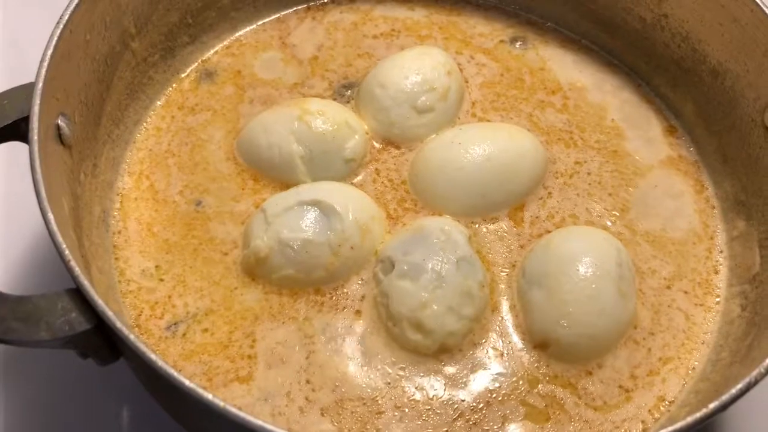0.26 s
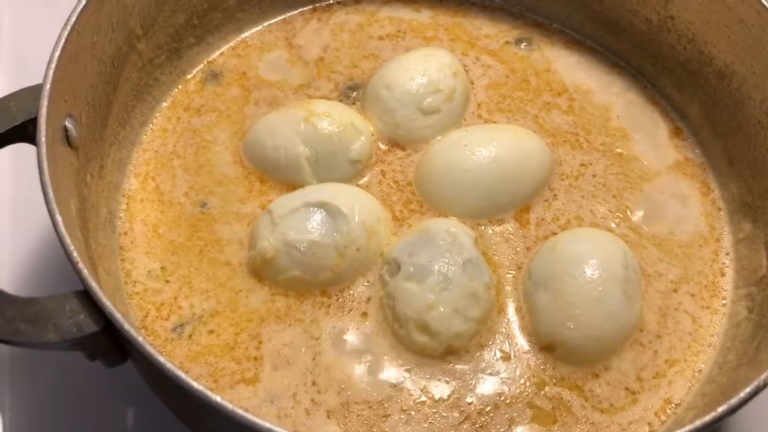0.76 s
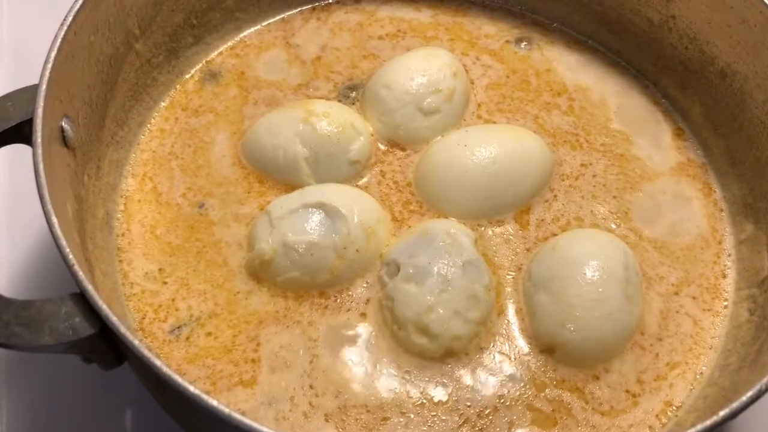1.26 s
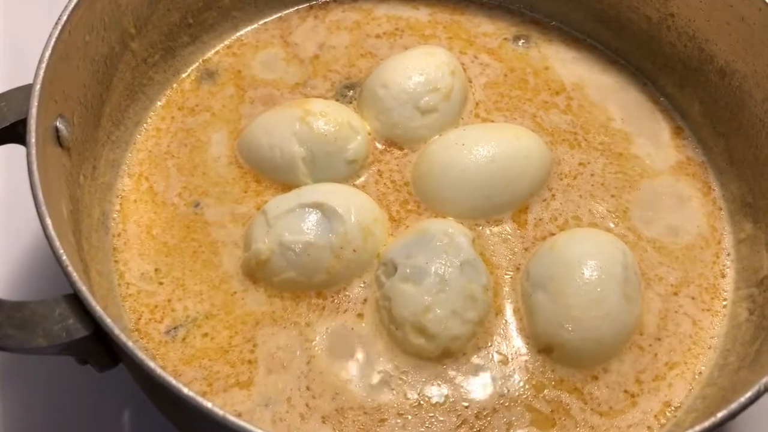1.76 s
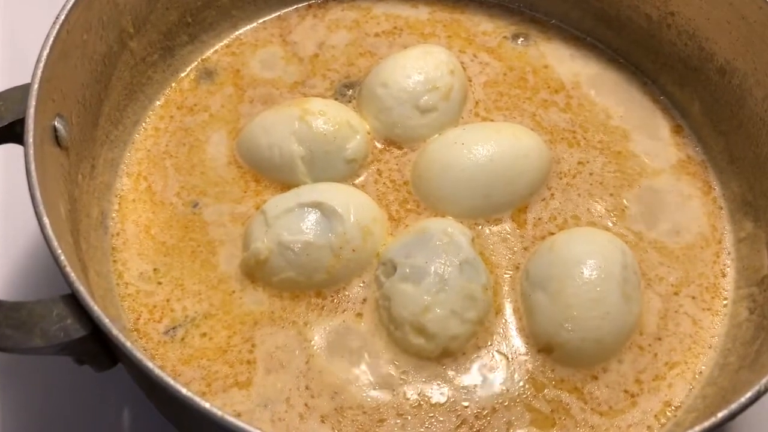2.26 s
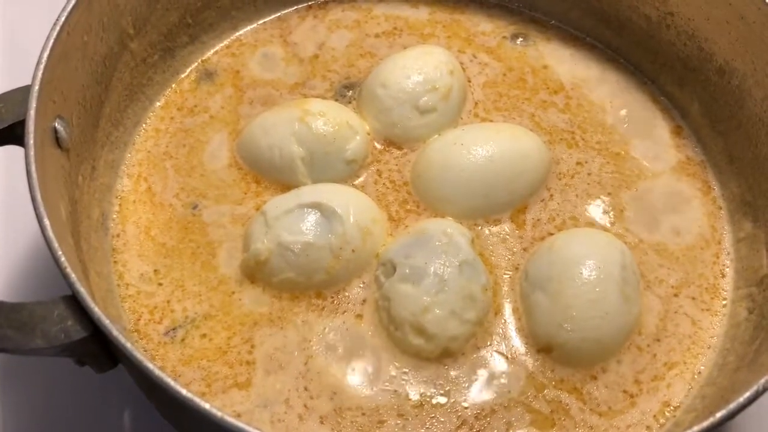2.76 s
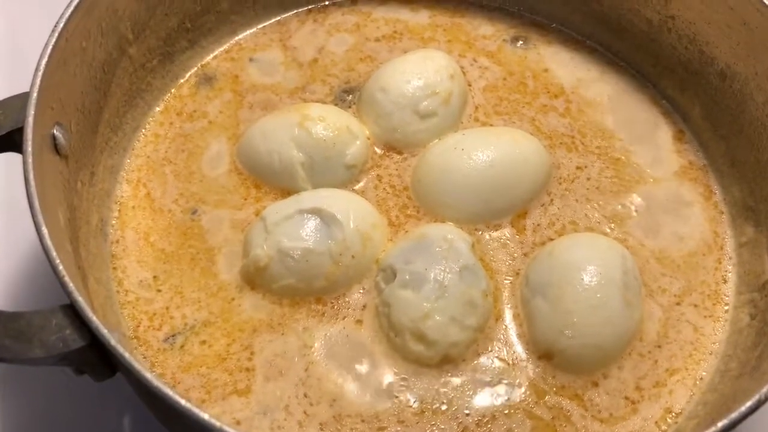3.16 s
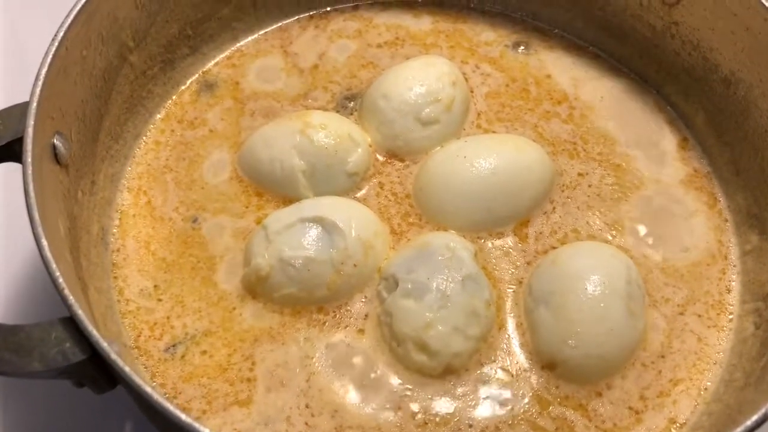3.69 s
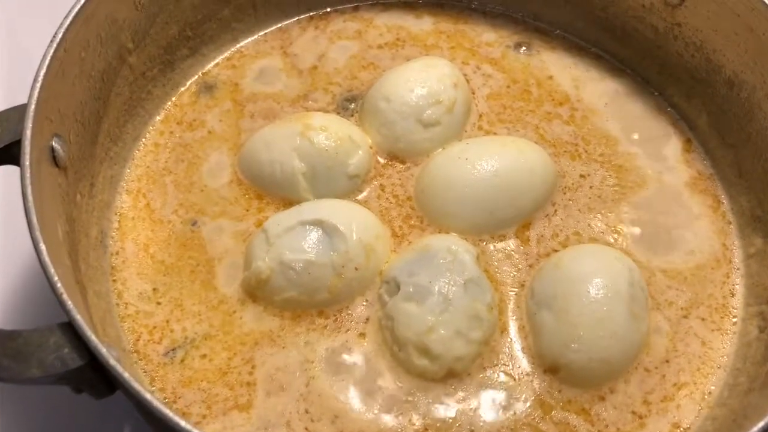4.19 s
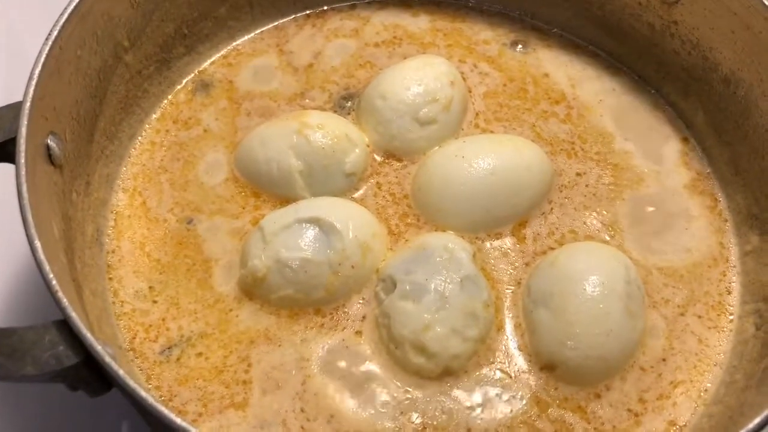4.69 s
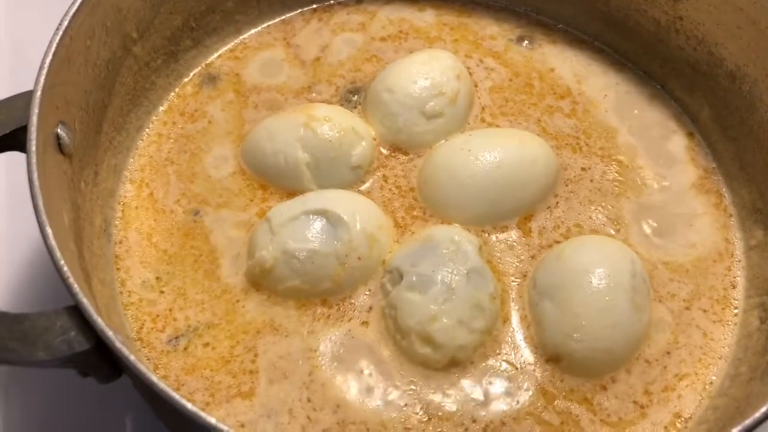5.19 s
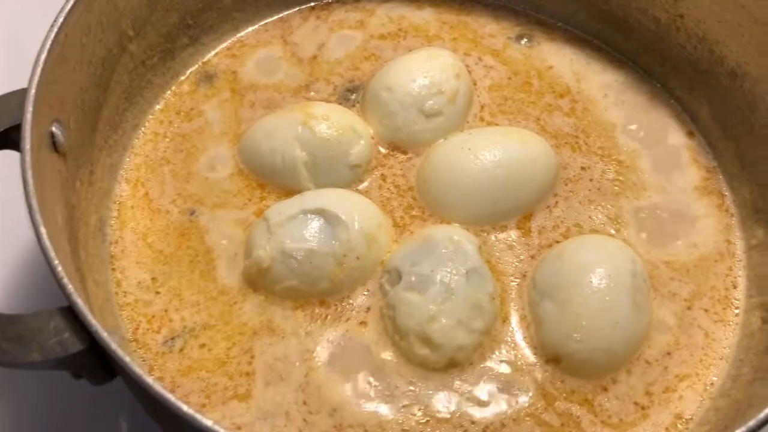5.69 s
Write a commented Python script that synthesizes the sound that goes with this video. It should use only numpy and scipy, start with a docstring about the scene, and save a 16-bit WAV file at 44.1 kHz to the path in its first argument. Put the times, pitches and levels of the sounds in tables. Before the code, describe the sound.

Constant deep fan drone in a kitchen, smooth and unchanging, over the very quiet fine fizz of a pot of sauce simmering.

```python
"""A small kitchen, where a pot simmers on the stove under an extractor fan.
Steady sines make the fan's hum at twice the mains frequency and a second motor's faint whine.
Shaped noise makes the low rumble of moving air, which rings in the room, and the even, fine hiss
of the simmering sauce. A few faint, high puffs are bright noise under rising and fading envelopes."""
import sys
import numpy as np
from scipy import signal
from scipy.fft import rfft, irfft
from scipy.io import wavfile
from scipy.ndimage import uniform_filter1d

SR = 44100
rng = np.random.default_rng(int(sys.argv[2]) if len(sys.argv) > 2 else 0)


def inscribe(sig):
    """Save sig as 16-bit PCM at rate SR to the path in sys.argv[1].

    A 1-D sig is mono; a 2-D sig holds one channel per row.
    Samples are clipped to [-1, 1] before scaling.
    """
    pcm = np.round(np.clip(np.atleast_2d(sig).T, -1, 1) * 32767)
    wavfile.write(sys.argv[1], SR, pcm.astype(np.int16))


N = 261954

MAINS_HUM_HZ = 119.96  # magnetic pull in the fan motor, twice a mains cycle
SHAFT_HZ = 59.212  # a second motor, turning a little below mains speed
# fan hum: multiples of the hum pitch
HUM_MULTIPLES = [1, 3, 4, 10]
# fan hum: rms of each multiple before its slow drift [level/dB]
HUM_LEVELS_DB = [-30.1, -61, -64.5, -77]
# motor whine: multiples of the shaft speed
SHAFT_ORDERS = [6, 46, 73, 76, 94, 95, 97, 119]
# motor whine: rms of each order [level/dB]
SHAFT_LEVELS_DB = [-68, -88.5, -93.5, -92.5, -85.5, -93, -92, -97]
# faint steady tones in the fan noise [f/Hz]
THIN_TONES_HZ = [833.6, 909.4, 1193.4]
# rms of those tones [level/dB]
THIN_TONE_LEVELS_DB = [-68.5, -68, -72.5]
# spectral shape of the fan's moving air: [f/Hz, relative level per Hz/dB]
AIR_COLOUR = [(20, -28.5), (35, -14.5), (60, -8.5), (110, -6), (170, -5), (230, -5), (300, -14.5),
              (420, -15.5), (650, -19.5), (900, -23.5), (1050, -27), (1450, -28.5), (1850, -38),
              (3000, -66)]
# standing waves of kitchen and hood: [f/Hz, width/Hz, relative level/dB]; negative = null at the microphone
STANDING_WAVES = [(49.8, 12, 9.5), (89.5, 18, 10.5), (138, 8.6, -10.5), (149, 13, 7), (198.7, 20, 5.5),
                  (271, 18, 5), (322, 23, 4), (365, 12, -6), (384, 17, 5.5), (578, 18, 5), (683, 22, -2.5),
                  (760, 34, 5.5), (868, 20, 4), (1980, 80, 2)]
# spectral shape of the simmer hiss: [f/Hz, relative level per Hz/dB]
FIZZ_COLOUR = [(1200, -11.5), (1900, -3), (2480, -.5), (3000, -2), (3450, 0), (3750, -4.5), (5300, -5.5),
               (5800, -10), (7900, -15.5), (9300, -15), (11000, -21), (13600, -24.5), (14150, -28.5),
               (14800, -26.5), (15700, -30)]
# faint high hisses, perhaps steam escaping: [start t/s, rise t/s, hold t/s, level/dB]
PUFFS = [(0.14, 0.044, 0.12, -74.5), (0.42, 0.08, 0.25, -82), (0.72, 0.08, 0.2, -77), (4.0, 0.3, 0.05, -81)]
# spectral shape shared by the puffs: [f/Hz, relative level per Hz/dB]
PUFF_COLOUR = [(8000, -30), (11400, -13), (12100, -4.5), (12600, 0.5), (13300, -10), (14200, -10.5),
               (14900, -6.5), (15700, -9)]


def gain_of(db):
    """Decibels to amplitude."""
    return 10 ** (np.asarray(db) / 20)


def evened(x):
    """Scales to rms 1."""
    return x / np.sqrt(np.mean(x ** 2))


def read(points, hz):
    """Reads a spectrum table on a log-frequency axis."""
    f, level_db = np.transpose(points)
    return np.interp(np.log(hz + 1), np.log(f + 1), level_db)


def coloured_noise(spectrum_gain):
    """White noise with each frequency scaled by the given gain."""
    return irfft(rfft(rng.standard_normal(N)) * spectrum_gain, N)


def drift(rate_hz):
    """Slow random wander of rms 1, up to about rate_hz changes a second."""
    hz = np.fft.rfftfreq(N, 1 / SR)
    return evened(coloured_noise((hz > 0) * np.exp(-(hz / rate_hz) ** 2)))


def tones(freqs_hz, levels_db):
    """Steady sines of random phase, each at its rms level."""
    t = np.arange(N) / SR
    total = np.zeros(N)
    for f, db in zip(freqs_hz, levels_db):
        amplitude = np.sqrt(2) * gain_of(db)  # rms to peak
        total += amplitude * np.sin(2 * np.pi * (f * t + rng.random()))
    return total


def motors():
    """Magnetic pull and turning shafts repeat exactly, so they sound as clean lines."""
    hum = tones(MAINS_HUM_HZ * np.array(HUM_MULTIPLES), HUM_LEVELS_DB)
    whine = tones(SHAFT_HZ * np.array(SHAFT_ORDERS), SHAFT_LEVELS_DB)
    thin_tones = tones(THIN_TONES_HZ, THIN_TONE_LEVELS_DB)
    hum_drift_db = 0.17 * drift(rate_hz=2.0)
    return hum * gain_of(hum_drift_db) + whine + thin_tones


def fan_air():
    """Turbulent air, lifted at the standing waves and dipped at the nulls."""
    level_db, drift_db = -38.5, 0.11  # rms before the room tail; rms of the level's wander
    hz = np.fft.rfftfreq(N, 1 / SR)
    ring_db = np.zeros(len(hz))
    for f, width, db in STANDING_WAVES:
        ring_db += db / (1 + (2 * (hz - f) / width) ** 2)  # resonance-shaped bump
    rush = coloured_noise(gain_of(read(AIR_COLOUR, hz) + ring_db))
    return gain_of(level_db + drift_db * drift(rate_hz=9.4)) * evened(rush)


def simmer():
    """Countless tiny bubbles merge into noise with faint patches; the boil swells a little."""
    level_db, swell_db = -63, 0.35  # rms before the room tail; rms of the swell
    patch_db = 0.6  # rms of the patches over time and frequency
    window, hop = 512, 128  # samples
    hz = np.fft.rfftfreq(window, 1 / SR)
    real, imag, patches = rng.standard_normal((N // hop + 5, len(hz), 3)).T
    patches = uniform_filter1d(patches, size=8, axis=0)  # smooth over frequency
    patches = evened(uniform_filter1d(patches, size=24, axis=1))  # smooth over time
    colour_db = read(FIZZ_COLOUR, hz)[:, None] + patch_db * patches
    frames = (real + 1j * imag) * gain_of(colour_db)
    hiss = signal.istft(frames, nperseg=window, noverlap=window - hop)[1][:N]
    return gain_of(level_db + swell_db * drift(rate_hz=2.5)) * evened(hiss)


def kitchen(x, wet_db, t60):
    """Hard walls add a dense tail above the single standing waves: a fine fixed spectral ripple."""
    n = SR // 2
    tail = rng.standard_normal(n) * gain_of(-60 * np.arange(n) / SR / t60)  # 60 dB down after t60 s
    tail /= np.linalg.norm(tail)
    highpass = signal.butter(4, 950, "high", fs=SR, output="sos")
    tail = signal.sosfilt(highpass, tail)
    return x + gain_of(wet_db) * signal.fftconvolve(x, tail)[:N]


def steam():
    """Each puff of hiss rises, holds and fades; all share one thin, bright colour."""
    fade_db_per_s = 45
    t, hz = np.arange(N) / SR, np.fft.rfftfreq(N, 1 / SR)
    colour_db = np.where(hz > 8000, read(PUFF_COLOUR, hz), -80)
    hiss = evened(coloured_noise(gain_of(colour_db)))
    power = np.zeros(N)
    for start, rise, hold, db in PUFFS:
        ramp = np.clip((t - start) / rise, 0, 1)
        fade_s = np.maximum(t - start - rise - hold, 0)
        power += (ramp * gain_of(db - fade_db_per_s * fade_s)) ** 2
    return np.sqrt(power) * hiss


def scene():
    """Everything reaches one microphone; only the air and the simmer pass through the room tail."""
    noise = fan_air() + simmer()
    mix = motors() + kitchen(noise, wet_db=-13, t60=0.35) + steam()
    return mix[None]  # one channel


def record(dry):
    """The band limit: a steep 40 Hz slope down to silence at the upper edge."""
    edge_hz = 15765
    hz = np.fft.rfftfreq(2 * N, 1 / SR)
    band = np.clip((edge_hz - hz) / 40, 0, 1)
    return irfft(rfft(dry, 2 * N) * band, 2 * N)[:, :N]


dry = scene()
out = record(dry)
inscribe(out)
```